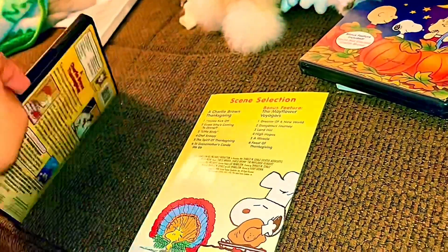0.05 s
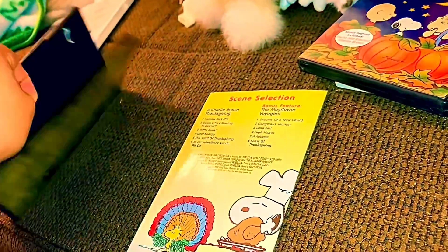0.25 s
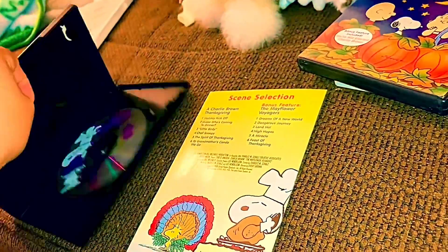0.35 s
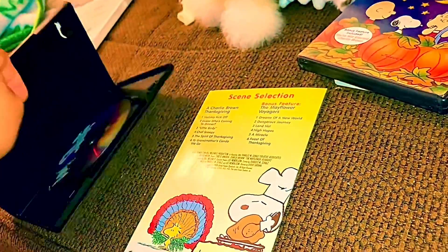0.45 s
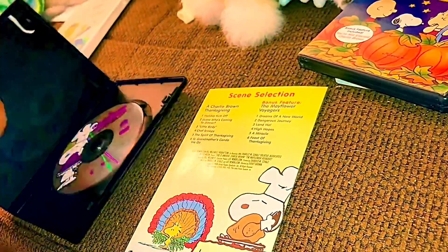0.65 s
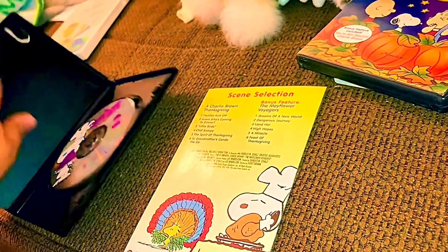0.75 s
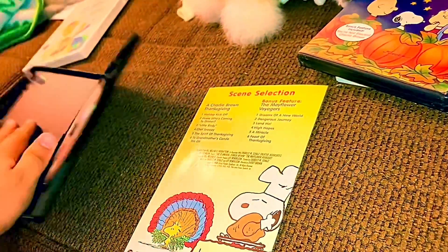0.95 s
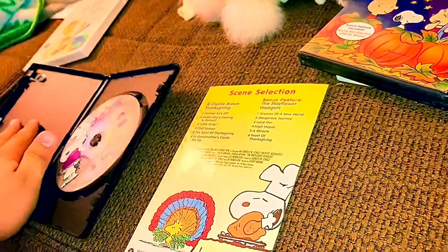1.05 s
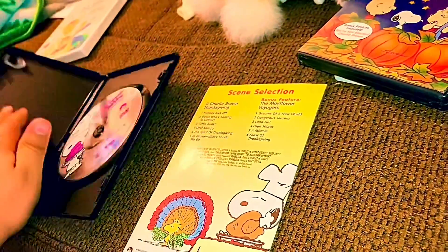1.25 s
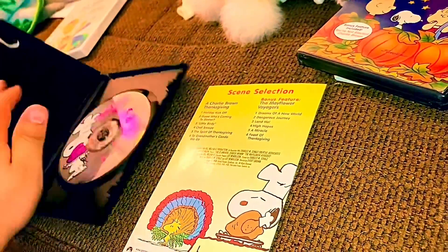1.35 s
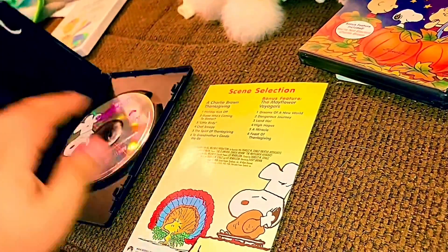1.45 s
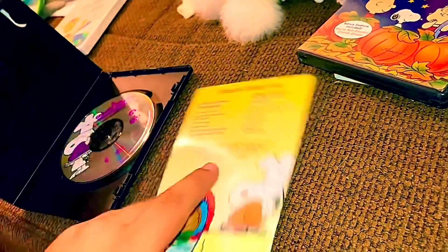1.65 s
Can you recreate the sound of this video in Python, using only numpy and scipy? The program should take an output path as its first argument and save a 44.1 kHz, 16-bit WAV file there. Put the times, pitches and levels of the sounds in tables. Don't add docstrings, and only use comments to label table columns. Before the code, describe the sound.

A plastic disc case is handled close to a stereo microphone in a small quiet room with low hum. Faint rubbing leads to a loud, hollow, clustered snap at about 0.23 seconds. Small ticks and hinge creaks follow until 0.65, with soft thumps and brushing. Quieter slides and ticks occur around 0.75 to 1.2, then dull hub clicks, a bump and rustle near 1.65.

```python
import sys
import numpy as np
from scipy import signal
from scipy.fft import rfft, irfft, next_fast_len
from scipy.io import wavfile
from scipy.ndimage import map_coordinates

SR = 44100
rng = np.random.default_rng(int(sys.argv[2]) if len(sys.argv) > 2 else 0)


def ratio_of_db(decibels):
    return 10 ** (np.asarray(decibels, float) / 20)


def transcribe(signal):
    frames = np.atleast_2d(signal).T
    limited = np.clip(frames, -1, 1)
    pcm = np.round(limited * 32767).astype(np.int16)
    wavfile.write(sys.argv[1], SR, pcm)


N = 74970

# start_s, peak_db, brightness_db, body_db, burst_ms
SNAPS = [(0.219,-36.5,-23.5,-5,10.8), (0.2339,-10,-15,-4,2.61), (.2368,-16,-16,0,2.08),
         (0.2442,-5,-18.5,2.5,1.48), (0.2471,-12,-23,1,1.54), (.2665,-35,-6,2,3.2), (.2825,-35,-7,13,2.4),
         (0.588,-48,-21,12,1.4), (0.5942,-41.5,-13,14,2), (0.6,-50,-25.5,7.5,3.1),
         (.617,-41,-11.5,11.5,1.9), (1.646,-33,-30,-3,2.8)]
# pitch_hz, width_hz, level_db
SHELL_MODES = [(429,88,0), (516,70,-4), (853,90,-3.5), (988,140,1.5), (1079,114.5,4), (1410,130,-10.5),
               (1603,140,-6), (1937,290,-6), (2155,152,-0.5), (2700,229,-8.5), (3550,1400,-12),
               (5400,310,-20)]
# pitch_hz, width_hz, level_db
BODY_MODES = [(133.6, 150, -21), (240, 150, -7.5), (340, 65, -0.5), (473, 180, 1)]
# pitch_hz, level_db
CRACK_COLOUR = [(1000, -25), (2500, 4), (4200, 10.5), (5500, 14), (8000, 16), (12000, 3), (15500, -2),
                (17000, -13)]
# start_s, level_db, pitch_hz, brightness_db, burst_ms
TICKS = [(.342,-37.5,1850,-11,2), (.349,-36.5,1220,-30.5,2.6), (0.4646,-56,1890,-4.5,1.4),
         (0.4924,-47,1825,-23.5,2), (.506,-54,1900,-28,1.66), (0.5183,-46,1700,-7,3.1),
         (.5636,-49,1300,-3,2.3), (.580,-53.5,2300,-21,2), (0.6025,-50.5,2027,-23,1.5),
         (.638,-48.5,2200,-7,1.8), (0.6414,-44,1300,-27,2), (.979,-53,1900,-17,1.4),
         (0.9994,-40.5,1530,-31,.6), (1.066,-45,2320,-21,2), (1.1054,-47.5,3100,-7.5,2.5),
         (1.125,-52,3090,-17,3.5), (1.6414,-42,3260,-6,0.63), (1.668,-40,1880,-20,1.5),
         (1.695,-39,1700,-9,2)]
# start_s, level_db, first_pitch_hz, t60_s
THUMPS = [(.02,-44.5,260,0.076), (0.079,-53,80.8,0.15), (.25,-32,380.6,0.24), (.30,-39,152.3,0.17),
          (0.346,-42,156,0.4), (0.6173,-38.5,811,0.15), (0.661,-61.5,70.25,0.27), (0.983,-48,100.8,0.159),
          (1.063,-46.5,67.4,0.5), (1.603,-48,250.6,0.11), (1.645,-37.5,260,0.12), (1.69,-37,151,0.143)]
# start_s, level_db
HUB_SLIPS = [
    (1.6793, -25),
    (1.6825, -28.5),
    (1.6872, -30),
]
# pitch_hz, width_hz, level_db
HUB_MODES = [(361,116,0), (482.6,77.2,0.5), (970,126,5.5), (1262,93,0), (1590,240,-1.5), (2225,300,-8),
             (2440,87,-1.5)]
# start_s, rise_s, hold_s, fall_s, level_db
TURNS = [
    (-0.064,0.03,.2,0.16,-56.5),
]
# pitch_hz, width_hz, level_db
EDGE_MODES = [(469, 39, -6), (810, 100, -10), (1360, 130, -1.5), (1720, 330, -3), (2150, 480, -5),
              (2510, 370, -6), (3500, 570, -23.5), (4400, 300, -21.5), (5500, 170, -31.5),
              (6350, 1000, -19.5), (7300, 2000, -28)]
# start_s, rise_s, hold_s, fall_s, level_db
DRAGS = [
    (.21,0.025,0.047,0.11,-45),
    (.55,0.034,0.057,0.0114,-53.5),
    (.72,0.068,0.15,0.113,-63),
    (.9,0.085,0.13,0.092,-60.5),
    (1.1,0.047,0.14,0.18,-63),
    (1.62,0.049,.06,0.045,-53),
]
# pitch_hz, width_hz, level_db
PILE_MODES = [(472, 170, 0.5), (830, 220, -4), (1272, 270, 1), (1710, 700, -1.5), (2005, 490, 2),
              (2426, 160, -15.5), (3570, 1400, -19.5)]
# start_s, rise_s, hold_s, fall_s, level_db
SLIDES = [
    (.45,0.0366,0.046,.03,-82.5),
    (.55,0.036,0.0188,0.033,-61),
    (.625,0.0099,0.0171,0.0093,-63.5),
    (.74,0.062,0.031,0.14,-56),
    (.86,0.037,0.043,0.034,-74),
    (1.05,0.032,0.038,0.21,-69.5),
    (1.19,0.063,0.0188,0.054,-74.5),
    (1.625,0.038,.05,0.043,-54),
]
# pitch_hz, level_db
FILM_COLOUR = [(2000, -25), (3200, -13.5), (4300, -13), (6000, -3), (8400, 2), (11500, -5.5),
               (14500, -11.5), (16500, -26.5)]
# pitch_hz, left_lead_radians
PORT_LEAD = [(0, 0), (3000, 1.3), (4400, 3.3), (5300, 7.0), (16500, 28.55)]
# pitch_hz, left_minus_right_db
PORT_LEAN = [(200, 1), (700, -1), (1500, -3), (3000, -2.5), (5000, .5), (6000, 0), (14000, 0)]
# pitch_hz, level_db
ROOM_SEND = [(100, -18), (400, 0), (1000, 1), (2200, -2), (4000, -9.5), (8000, -17), (16000, -35.5)]
# pitch_hz, t60_s
ROOM_DECAY = [(200, 0.058), (1500, 0.16), (5000, 0.22), (14000, 0.028)]
# pitch_hz, level_db
AIR_COLOUR = [(60,-8), (190,-27.5), (320,-23), (500,-27), (1000,-40), (1350,-34.5), (2300,-44), (3200,-58),
              (9000,-64), (16000,-80)]
# pitch_hz, likeness (0 to 1)
AIR_ALIKE = [(60, 1), (500, 0.6), (2000, 0.77), (8000, 0.47)]
# pitch_hz, width_hz, level_db
HUM_MODES = [(59.2, 3.8, 2.5), (123.9, 6, -8)]


def unit(x):
    return x / np.sqrt(np.mean(x ** 2) + 1e-20)


def along(points, hz):
    f, v = np.transpose(points)
    return np.interp(np.log(hz + 1), np.log(f + 1), v)


def wobble(rate):
    return map_coordinates(rng.standard_normal(int(N * rate / SR) + 4), [np.arange(N) * rate / SR])


def filtered(x, response):
    m = next_fast_len(N + SR // 2)
    return irfft(rfft(x, m) * response(np.fft.rfftfreq(m, 1 / SR)), m)[..., :N]


def rings(modes):
    def response(f):
        total = 0
        for k, (hz, width, db) in enumerate(modes):
            total = total + (-1) ** k * ratio_of_db(db) * 1j * f * width / (hz * hz - f * f + 1j * f * width)
        return total
    return response


def shaped(points):
    return lambda hz: ratio_of_db(along(points, hz))


def dull(hz_edge):
    return lambda f: 1 / (1 + 1.4j * f / hz_edge - (f / hz_edge) ** 2)


def gritty(grit_db, rate):
    return rng.standard_normal(N) * ratio_of_db(grit_db * wobble(rate))


def strokes(rows):
    t = np.arange(N) / SR
    gain = np.zeros(N)
    for s, rise, hold, fall, db in rows:
        corners = np.cumsum([s - .3, .3, rise, hold, fall, .3])
        gain += ratio_of_db(db + np.interp(t, corners, [-80.5, -20.5, 3.5, 0.0, -21.5, -74]))
    return gain


def bursts(times, levels_db, t60s, kick=0.):
    out, t = np.zeros(N + SR), np.arange(SR // 5) / SR
    for s, db, t60 in zip(times, levels_db, t60s):
        burst = rng.standard_normal(len(t)) * ratio_of_db(-60 * t / t60) * (1 - np.exp(-8 * t / t60))
        burst = np.sqrt(1 - kick) * burst / np.linalg.norm(burst)
        burst[int(t60 * SR / 12)] -= np.sqrt(kick)
        out[round(s * SR):][:len(t)] += ratio_of_db(db) * burst
    return out[:N]


def snaps():
    s, db, bright_db, body_db, ms = np.transpose(SNAPS)
    t60, kick = ms * .004, .7
    shell = filtered(bursts(s, db + 31, t60, kick), rings(SHELL_MODES))
    body = filtered(bursts(s, db + body_db + 21.5, t60, kick), rings(BODY_MODES))
    crack = filtered(bursts(s, db + bright_db + 12, 1.3 * t60), shaped(CRACK_COLOUR))
    return filtered(shell + body, dull(hz_edge=3600)) + crack


def ticks():
    s, db, hz, bright_db, ms = np.transpose(TICKS)
    t60 = ms * 0.0048
    out = filtered(bursts(s, db + bright_db + 11, t60), shaped(CRACK_COLOUR))
    for start, level, pitch, decay in zip(s, db, hz, t60):
        panel = rings([(pitch, 0.97 * pitch, 0)])
        burst = bursts([start], [level + 27], [decay], kick=0.62)
        out += filtered(filtered(burst, panel), panel)
    return out


def thumps():
    floor_hz, sag_s, rise_s = 62, .0055, .0015
    out, t = np.zeros(N + SR), np.arange(SR // 2) / SR
    for s, db, first_hz, t60 in THUMPS:
        turns = floor_hz * t + (first_hz - floor_hz) * sag_s * (1 - np.exp(-t / sag_s))
        swell = ratio_of_db(db - 60 * t / t60) * (1 - np.exp(-t / rise_s))
        out[round(s * SR):][:len(t)] += swell * np.sin(2 * np.pi * turns)
    return out[:N]


def hub():
    s, db = np.transpose(HUB_SLIPS)
    slips = bursts(s, db + 29.5, np.full(len(s), .006), kick=0.675)
    return filtered(filtered(slips, rings(HUB_MODES)), dull(hz_edge=3500))


def rubbing():
    edge = unit(filtered(gritty(grit_db=0.5, rate=870), rings(EDGE_MODES)))
    turn = strokes(TURNS) * ratio_of_db(0.94 * wobble(24)) * edge
    pile = unit(filtered(gritty(grit_db=2, rate=300), rings(PILE_MODES)))
    drag = strokes(DRAGS) * ratio_of_db(1.4 * wobble(25)) * pile
    return filtered(turn, dull(hz_edge=19000)) + filtered(drag, dull(hz_edge=3000))


def sliding():
    hiss = unit(filtered(gritty(grit_db=0.0, rate=300), shaped(FILM_COLOUR)))
    return strokes(SLIDES) * ratio_of_db(1.2 * wobble(50)) * hiss


def ports(x):
    def response(hz):
        half = ratio_of_db(along(PORT_LEAN, hz) / 2) * np.exp(.5j * np.interp(hz, *np.transpose(PORT_LEAD)))
        return np.array([half, 1 / half])
    return filtered(x, response)


def room(x):
    hz, t, z = signal.stft(rng.standard_normal((2, SR // 2)), SR, nperseg=256)
    tail = signal.istft(z * ratio_of_db(-60 * t / along(ROOM_DECAY, hz)[:, None]), SR, nperseg=256)[1]
    late = np.pad(x, (150, 0))[None]
    return signal.fftconvolve(late, tail / np.linalg.norm(tail[0]), axes=1)[:, :N]


def echoes():
    s, db = np.transpose(SNAPS + TICKS)[:2]
    return room(filtered(bursts(s, db + 15.5, np.full(len(s), .03)), shaped(ROOM_SEND)))


def air():
    def spread(hz):
        angle = np.arccos(np.clip(along(AIR_ALIKE, hz), -1, 1)) / 2
        return ratio_of_db(along(AIR_COLOUR, hz)) * (hz > 90) * np.array([np.cos(angle), np.sin(angle)])
    mid, side = filtered(rng.standard_normal((2, N)), spread)
    tone = unit(np.array([mid + side, mid - side]))
    hum_colour = shaped([(30, -18.5), (55, -1.5), (130, -5.5), (300, -18.0)])
    humming = filtered(rng.standard_normal((2, N)), rings(HUM_MODES))
    hum, sway = unit(filtered(humming, hum_colour))
    return ratio_of_db(-62) * tone + ratio_of_db(-57) * (hum + ratio_of_db(-14) * sway * [[1], [-1]])


def scene():
    rub, slide, tick = rubbing() + hub(), sliding(), ticks()
    near = ports(snaps() + tick + rub + slide + thumps())
    alike = ratio_of_db(-10.5) * np.roll(tick + rub, 9)
    answer = ratio_of_db(-6.5) * echoes() + room(ratio_of_db(-8.5) * rub + ratio_of_db(-17) * slide)
    return near + alike + answer + air()


def roll_off(x):
    return signal.sosfilt(signal.butter(12, 16850, fs=SR, output="sos"), x)


def record(dry):
    top_hz = 16800
    mix = filtered(dry, lambda hz: hz < top_hz)
    return roll_off(mix)


dry = scene()
out = record(dry)
transcribe(out)
```